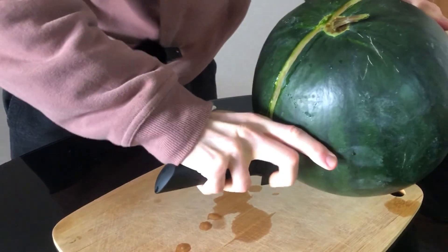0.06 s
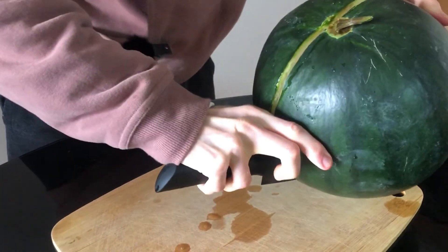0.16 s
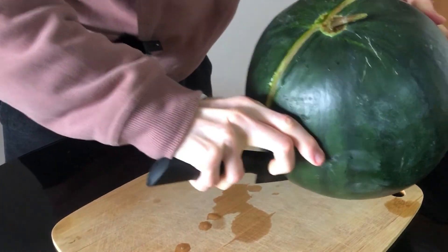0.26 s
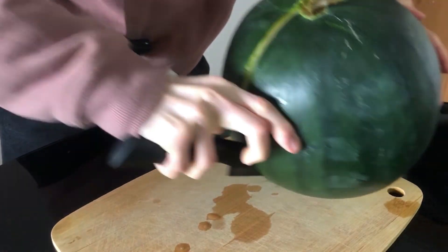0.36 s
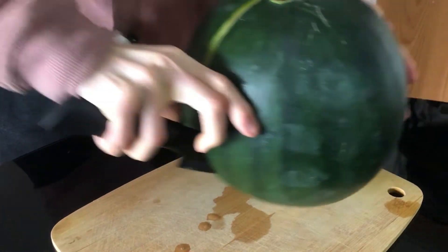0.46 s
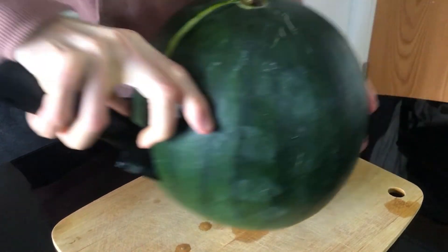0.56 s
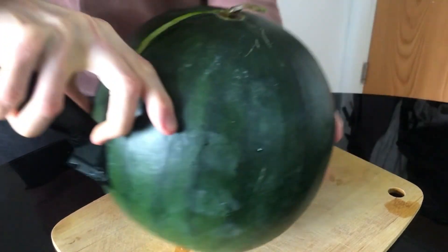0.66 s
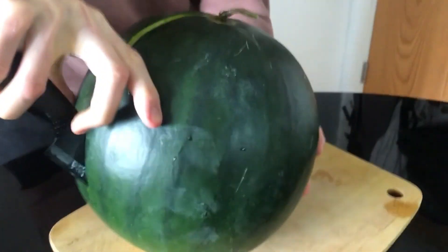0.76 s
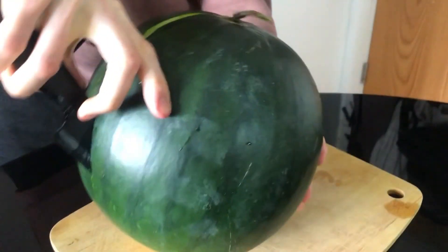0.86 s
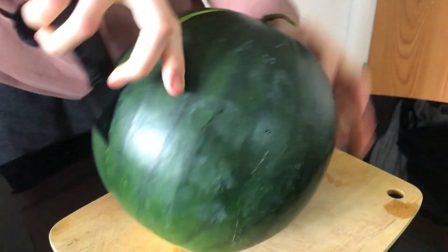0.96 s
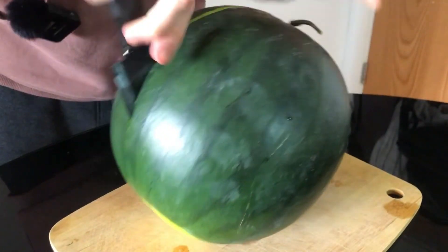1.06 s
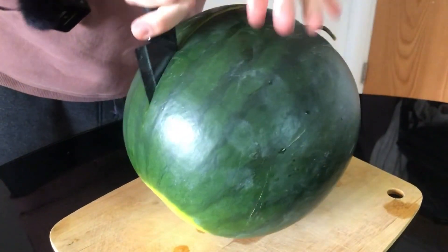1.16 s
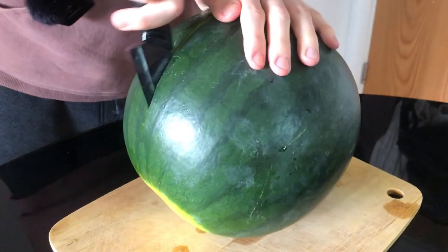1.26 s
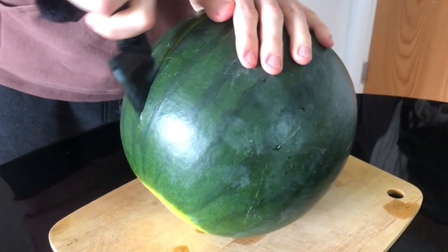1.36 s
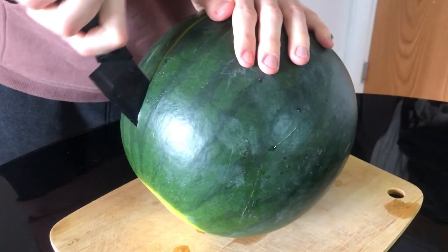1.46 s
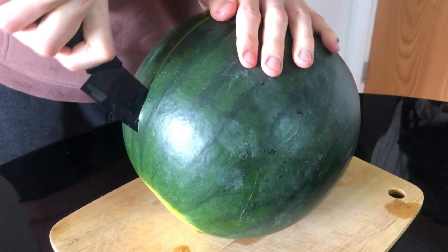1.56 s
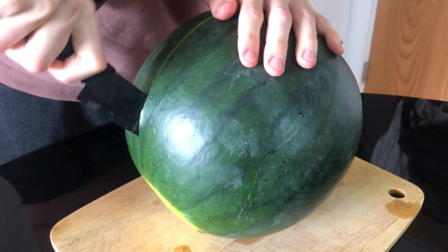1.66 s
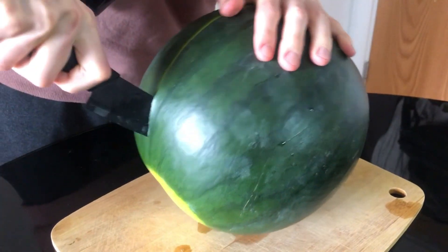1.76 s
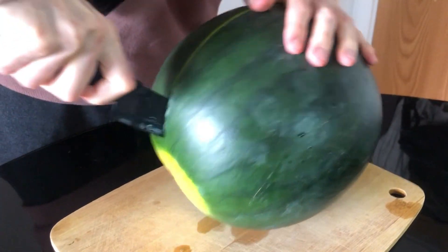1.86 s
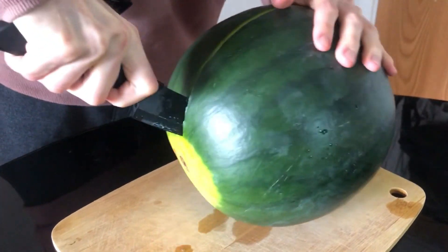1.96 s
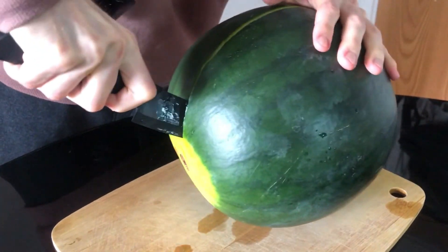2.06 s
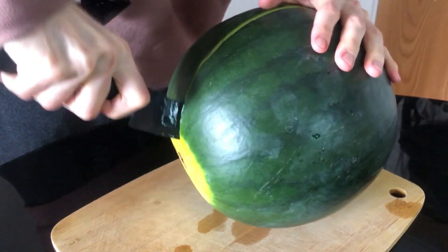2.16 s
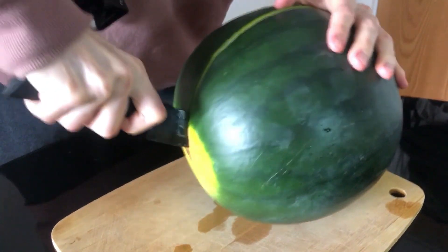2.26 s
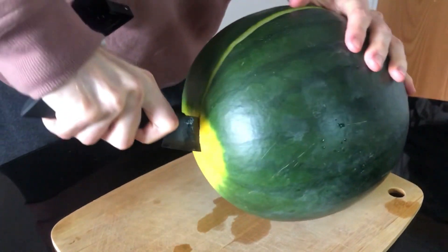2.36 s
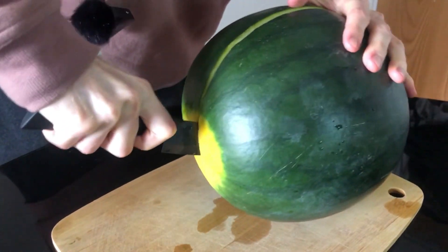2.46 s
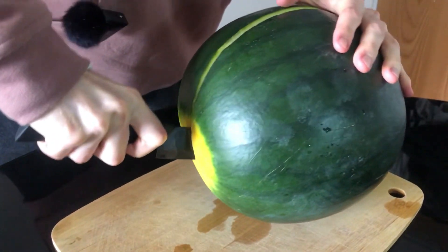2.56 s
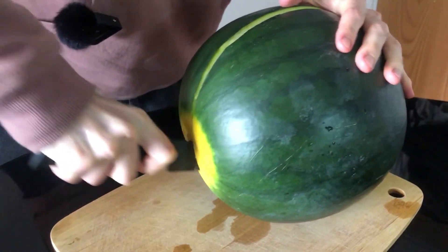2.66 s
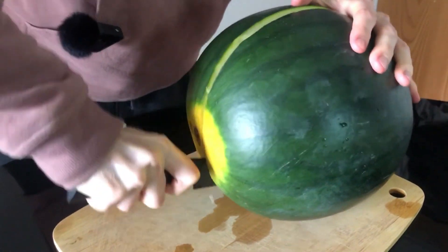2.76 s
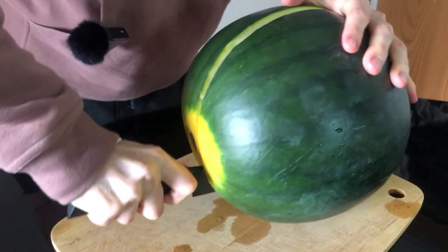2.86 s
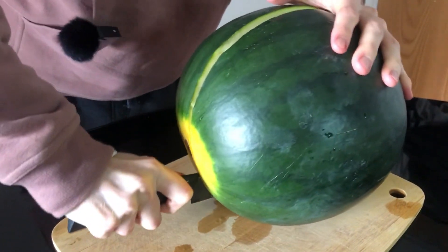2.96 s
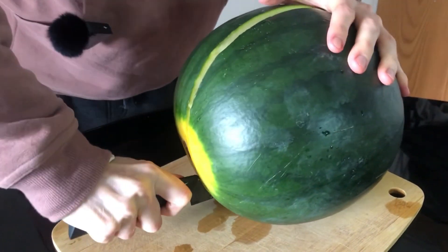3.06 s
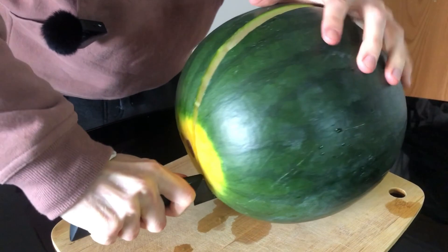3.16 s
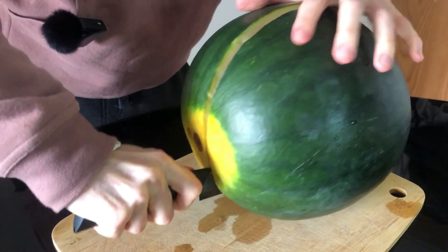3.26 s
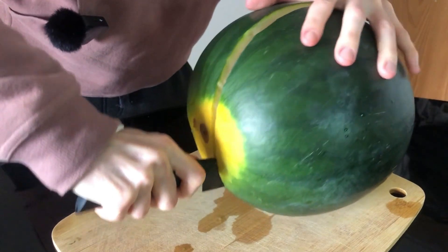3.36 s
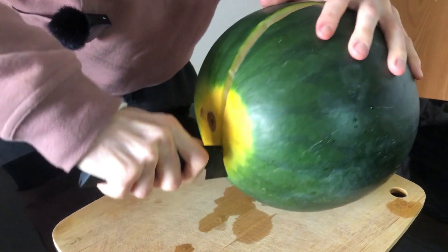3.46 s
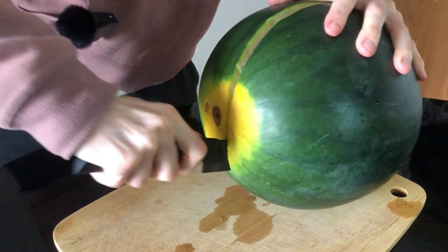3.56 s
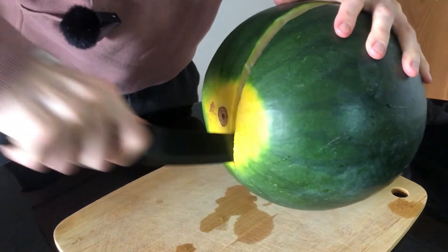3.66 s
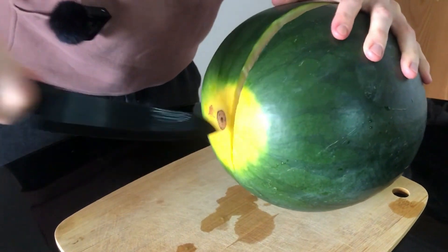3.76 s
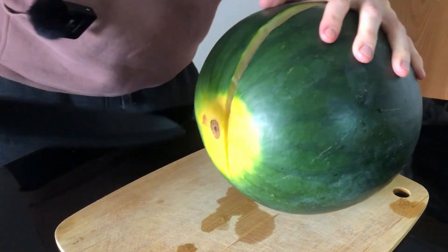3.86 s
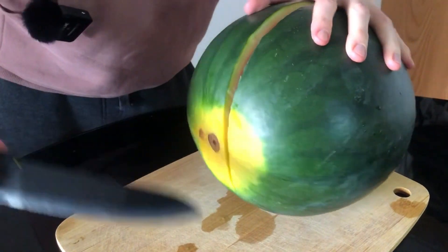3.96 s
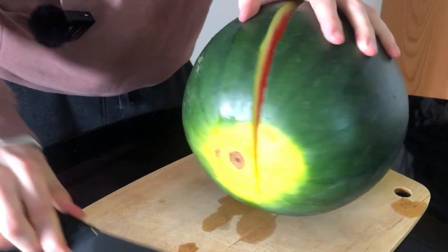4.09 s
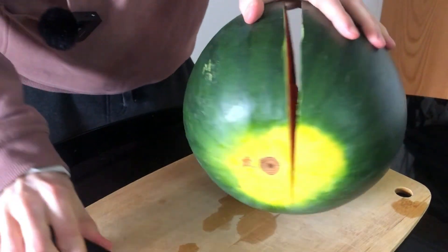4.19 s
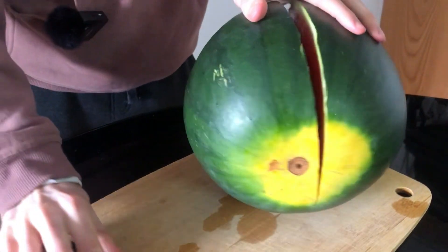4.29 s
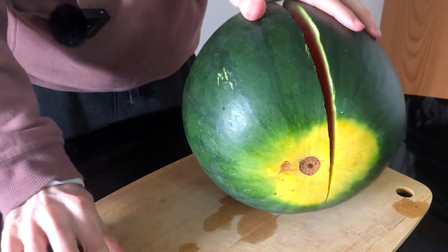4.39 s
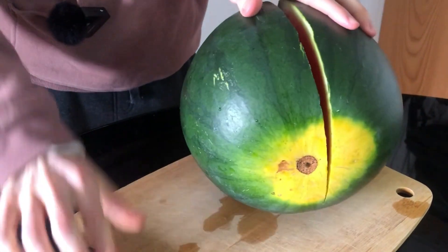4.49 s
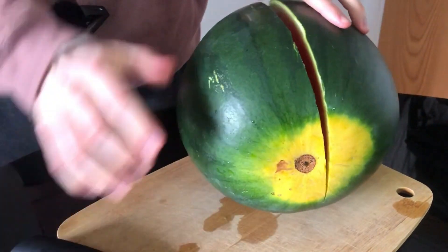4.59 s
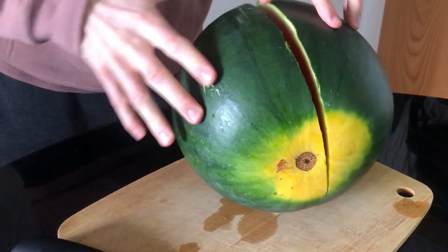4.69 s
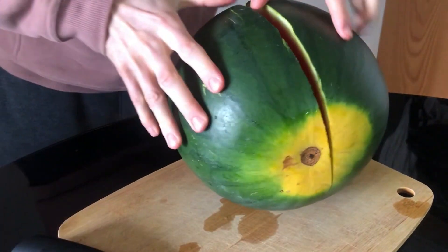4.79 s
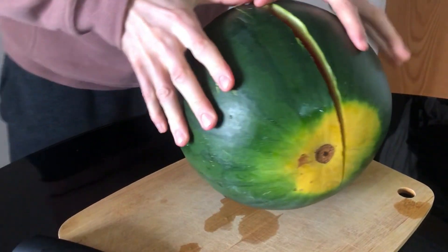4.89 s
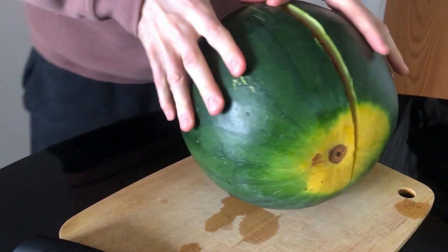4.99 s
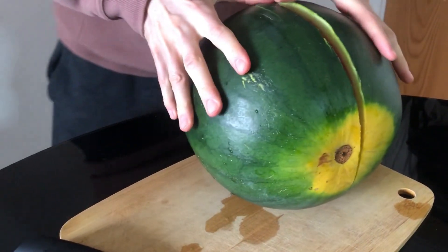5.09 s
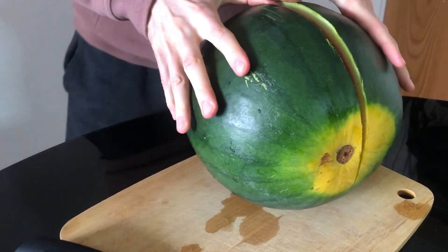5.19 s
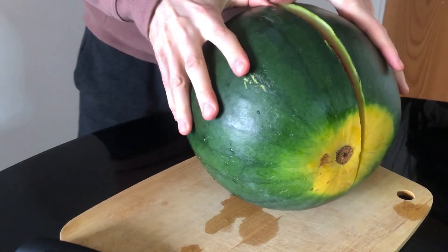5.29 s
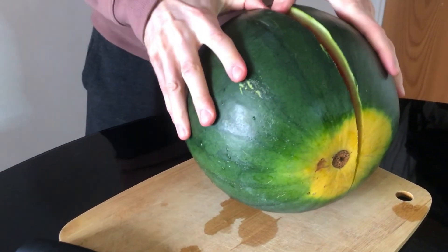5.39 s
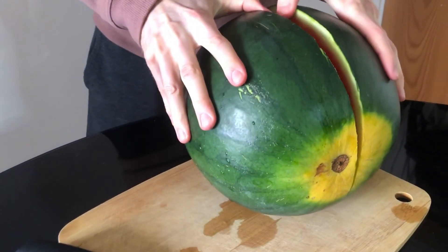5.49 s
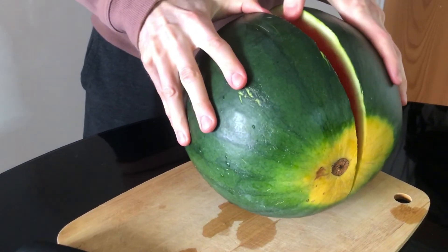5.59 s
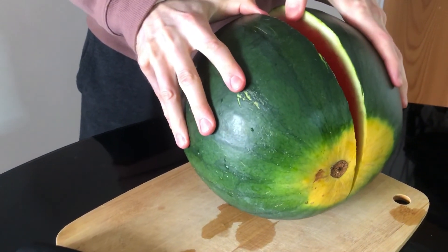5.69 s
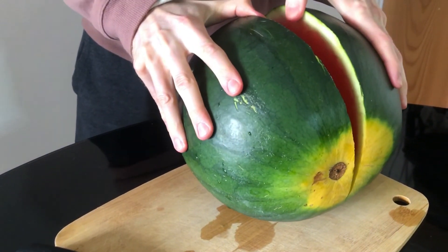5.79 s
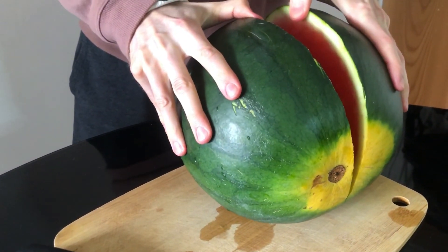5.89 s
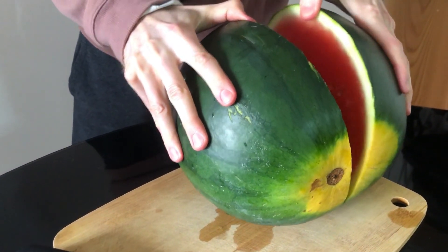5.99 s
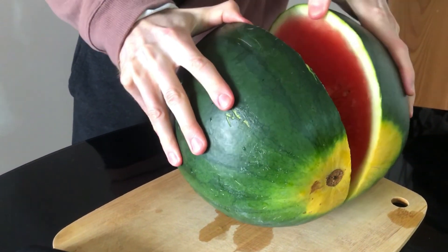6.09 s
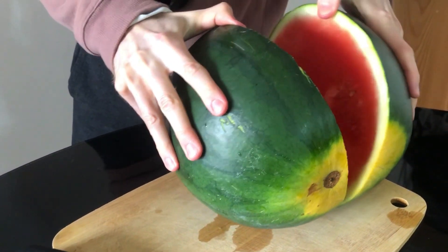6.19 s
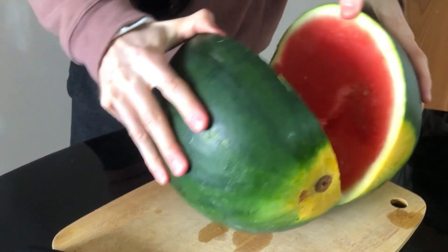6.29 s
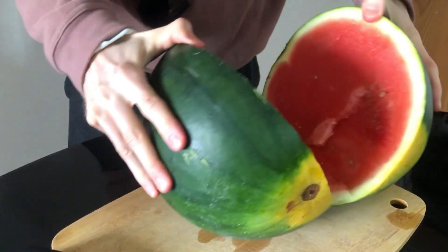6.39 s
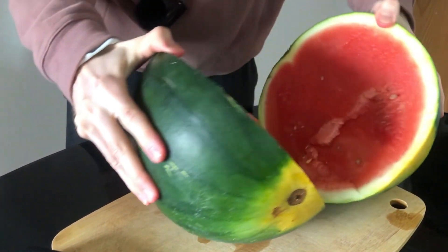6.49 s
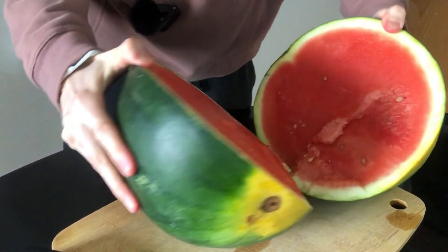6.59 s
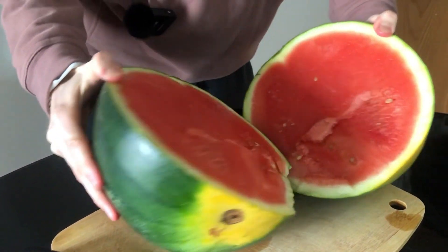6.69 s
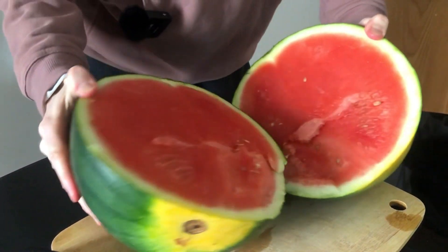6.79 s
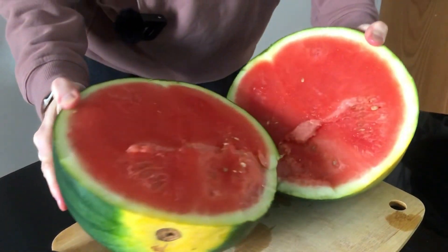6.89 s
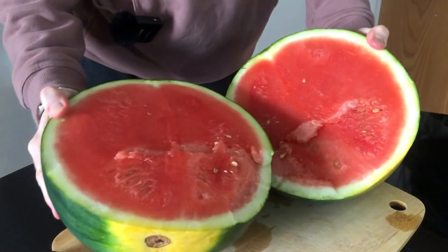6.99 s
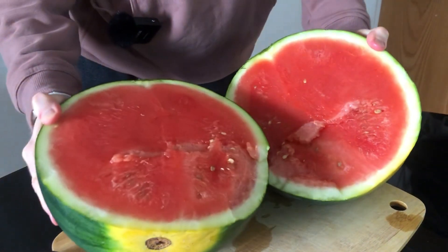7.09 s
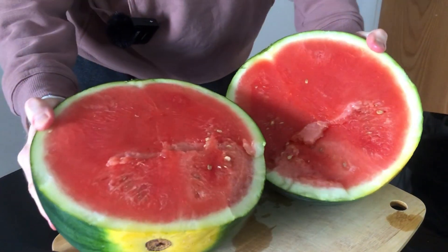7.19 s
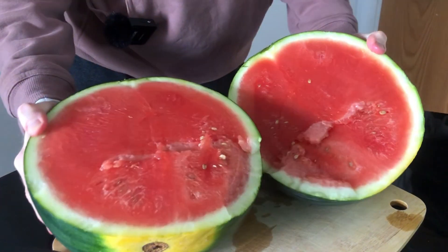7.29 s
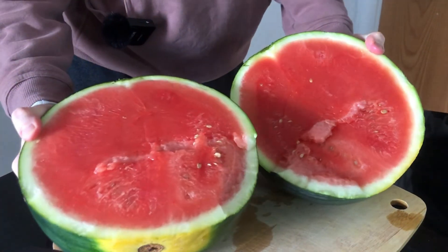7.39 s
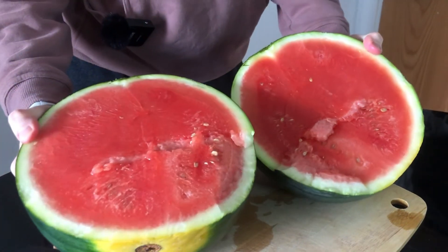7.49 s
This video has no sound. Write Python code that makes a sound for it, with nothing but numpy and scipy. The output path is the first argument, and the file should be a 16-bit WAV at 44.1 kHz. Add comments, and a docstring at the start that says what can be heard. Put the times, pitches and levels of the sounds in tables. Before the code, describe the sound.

A heavy watermelon bumps onto a wooden board, a knife saws its crackling rind, then the halves rip apart with a loud wet crunch.

```python
"""Soft knocks and a skin squeak, then a watermelon bumps on a wooden board; a knife saws its crackling rind.
The knife is laid down, sleeves rustle, and the halves are torn apart with a loud wet crunch.
Fractures and bursting cells are impulses through damped resonances; blows ring modes of board and table.
Rubbing is grainy coloured noise. A small kitchen answers; a close microphone overloads on the sharpest cracks.
"""
import sys
import numpy as np
from scipy import signal
from scipy.fft import rfft, irfft, next_fast_len
from scipy.io import wavfile
from scipy.ndimage import map_coordinates

SR = 44100
rng = np.random.default_rng(int(sys.argv[2]) if len(sys.argv) > 2 else 0)


def bounce(signal):
    """Save signal as a 16-bit WAV file at the path given by the first command-line argument."""
    frames = np.transpose(np.atleast_2d(signal))
    limited = np.clip(frames, -1, 1)
    pcm = np.round(limited * 32767).astype(np.int16)
    wavfile.write(sys.argv[1], SR, pcm)


N = 332800

# the deepening split: time_s, air_hz, air_db (relative to the pop level), whole (rind still intact, 0-1)
SPLIT = [(2.9, 420, -11, 1), (5.7, 1084, -6.5, 0.77), (5.998, 1007, -4.5, 0.71), (6.071, 749, -9.5, .25),
         (6.45, 700, -12, 0.18)]
# wet blade in the cut: full_speed_s, hold_s, hiss_db, crackle_db
STROKES = [(1.442, 0.31, -46, -66), (1.52, .13, -45, -62), (1.825, .22, -41, -44),
           (2.275, 0.24, -36.5, -39), (2.789, 0.08, -33, -27), (3.115, 0.013, -50.5, -70),
           (3.272, 0.011, -49, -48.5), (3.402, .02, -56.5, -62), (3.561, .005, -50, -58),
           (3.721, .11, -48.5, -62)]
# spectrum of dense panel modes: hz, relative_db
CLATTER = [(50, -31), (130, 0.5), (450, -2), (1200, -1), (2600, -6.5), (6500, -10), (9500, -21),
           (15000, -44)]


def amp(db):
    """Decibels to gain."""
    return 10 ** (np.asarray(db) / 20)


def unit(x):
    """Scale to rms 1."""
    return x / np.sqrt(np.mean(x ** 2) + 1e-20)


def along(points, hz):
    """Read (Hz, value) points on a log frequency axis."""
    f, v = np.transpose(points)
    return np.interp(np.log(hz + 1), np.log(f + 1), v)


def wobble(rate_hz):
    """Smooth random curve through rate_hz knots a second."""
    knots = rng.standard_normal(int(N * rate_hz / SR) + 4)
    return map_coordinates(knots, [np.arange(N) * rate_hz / SR])


def filtered(x, response):
    """Multiply the spectrum of x by a response of frequency."""
    m = next_fast_len(len(x) + SR // 2)
    return irfft(rfft(x, m) * response(np.fft.rfftfreq(m, 1 / SR)), m)[:len(x)]


def coloured(x, spectrum):
    """Shape x by (Hz, dB) points and scale to rms 1."""
    return unit(filtered(x, lambda hz: amp(along(spectrum, hz))))


def resonance(f, hz, q):
    """Causal response of one damped resonance."""
    return 1j * f * hz / q / (hz ** 2 - f ** 2 + 1j * f * hz / q)


def place(times_s, sounds):
    """Add each row of sounds to the time line at its start."""
    starts = np.round(np.asarray(times_s) * SR).astype(int)[:, None]
    at = starts + np.arange(np.shape(sounds)[1])
    return np.bincount(at.ravel(), np.ravel(sounds), N)[:N]


def ring(modes, scatter_db):
    """Damped sine modes with random strengths and signs; the rms starts near 1."""
    hz, db, t60_s = np.transpose(modes)[:, :, None]
    t = np.arange(SR // 2) / SR
    gain = amp(db + scatter_db * rng.standard_normal(hz.shape)) * rng.choice([-1, 1], hz.shape)
    decay = np.exp(-np.log(1000) * t / t60_s)
    return np.sum(gain * np.sin(2 * np.pi * hz * t) * decay, 0) / np.sqrt(np.sum(gain ** 2) / 2)


def swells(starts_s, holds_s, levels_db, rise_db_per_s, fall_db_per_s):
    """Gain of hand movements: each rises, holds and falls at steady rates in dB."""
    t = np.arange(N) / SR
    gain = np.zeros(N)
    for s, hold, db in zip(starts_s, holds_s, levels_db):
        rise = rise_db_per_s * np.maximum(s - t, 0)
        fall = fall_db_per_s * np.maximum(t - s - hold, 0)
        gain += amp(db - rise - fall)
    return gain


def bursts(hz, q, rough, life_s, top_hz, size=1024):
    """Spectra of tiny ruptures: impulse and ragged tail excite a resonance; rms 1 over a millisecond."""
    t, f = np.arange(size) / SR, np.fft.rfftfreq(size, 1 / SR)
    tail = rng.standard_normal((len(hz), size)) * np.exp(-t / life_s) * np.sqrt(2 / (life_s * SR))
    # soft, wet tissue swallows the highest treble
    wet = 1 / (1 + 1j * f / top_hz) ** 2 / np.sqrt(1 + (f / 11500) ** 6)
    z = rfft((t == 0) + rough * tail) * resonance(f, hz[:, None], q) * wet
    return z / np.sqrt(np.sum(irfft(z) ** 2, 1, keepdims=True) * 1000 / SR)


def through_rind(z, travel_s):
    """Bending waves carry treble faster than bass, so a crack chirps downward the longer it travels."""
    f = np.linspace(0, SR / 2, z.shape[1])
    phase = 2 * np.pi * travel_s[:, None] * (2 * np.sqrt(1000 * f) - f * np.sqrt(1000 / f[-1]))
    return irfft(z * np.exp(-1j * phase))


def cracks():
    """Each fracture is a bright snap and a lower pop, ringing the split's air and the still whole melon."""
    # largest fractures: time_s, snap_db, pop_db, pop_hz; levels before the offsets below
    fractures = [(1.354, -34.5, -42, 1300), (1.8104, -13, -19.5, 1350), (1.8457, -12, -26, 1800),
                 (1.8593, -19.5, -35.5, 1500), (1.9065, -1, -10, 1500), (1.9305, -8, -5, 1000),
                 (1.956, -7.5, -15, 1250), (1.978, -2.5, -8.5, 1280), (2.0063, -5, -10, 1000),
                 (2.148, -20.5, -18.5, 1550), (2.253, -13, -11.5, 730), (2.2993, -2, -11, 1080),
                 (2.3505, -1.5, -0.5, 1800), (2.38, -8.5, -21.5, 1530), (2.4158, -2.5, -12, 1350),
                 (2.4683, -2.5, -11, 1500), (2.523, -6, -13, 1140), (2.7683, -17, -20, 1200),
                 (2.787, -4, -12, 1090), (2.8042, -9, -13.5, 1000), (2.8278, -11, -15, 770),
                 (2.8376, -18.5, -21, 1050), (2.8722, -6.5, -14, 1000), (2.9027, -11.5, -18.5, 1000),
                 (2.9652, -26.5, -27.5, 1810), (3.2766, -32.5, -32, 1400), (3.3292, -28, -38.5, 2000),
                 (5.6217, -30.5, -30, 1500), (5.6632, -24, -25.5, 1720), (5.6955, -22, -34, 1700),
                 (5.742, -13.5, -19, 1320), (5.763, -18.5, -32, 1370), (5.8368, -16, -12, 1340),
                 (5.8954, -14.5, -26, 1400), (5.9423, -12, -17.5, 1670), (5.9873, -6.5, -15.5, 1100),
                 (6.0596, -3, 0, 1050), (6.0696, -5, -4, 1180), (6.1024, -4, -1, 1250),
                 (6.1118, -5.5, -12, 1340), (6.1422, 1.5, -6, 1330), (6.1535, 1.5, -5.5, 1050),
                 (6.1702, -11.5, -9, 1800), (6.1913, -5, -14.5, 2000), (6.2278, -0.5, -5, 1100),
                 (6.2393, -0.5, -5.5, 1000), (6.278, -3, -8.5, 1600), (6.3231, 1, 1, 1700),
                 (6.329, 0, -16.5, 1200), (6.3554, 2.5, -1.5, 1250), (6.3788, 3.5, -6, 1330),
                 (6.384, 3, -5.5, 1200), (6.4002, 3.5, -11.5, 1600), (6.4225, -4.5, -13.5, 1300),
                 (6.4252, 0, -18, 1230), (6.4463, -8, -12, 1200), (6.47, -6.5, -16.5, 1230),
                 (6.5334, -12, -29, 1550), (6.6127, -20, -30.5, 720)]
    # break moving from rind through flesh to last fibres: time_s, snap_hz
    snap_pitch = [(2.35, 4400), (2.8, 4700), (5.9, 4500), (6.13, 3500), (6.38, 4400), (6.6, 5900)]
    # hollow ring of the melon on its board: hz, relative_db, t60_s
    melon_modes = [(108, 2.5, 0.17), (147, 1, 0.16), (204, -3.5, .16), (286, 2, 0.14), (339.7, -3, 0.24),
                   (376, -5, .16), (519.4, -5.5, .13), (606, -0.5, 0.13)]
    s, snap_db, pop_db, pop_hz = np.transpose(fractures)
    spread = 0.097  # log pitch, snap to snap
    snap_hz = np.interp(s, *np.transpose(snap_pitch)) * np.exp(spread * rng.standard_normal(len(s)))
    when, *split = np.transpose(SPLIT)
    air_hz, air_db, whole = [np.interp(s, when, column) for column in split]

    snap = bursts(snap_hz, q=2.3, rough=0.92, life_s=0.00091, top_hz=7760)
    pop = bursts(pop_hz, q=1.1, rough=1.0, life_s=0.0026, top_hz=3000)
    push = bursts(pop_hz * 0.44, q=0.89, rough=.4, life_s=.0025, top_hz=1200)
    air = bursts(air_hz, q=2.1, rough=0.53, life_s=0.001, top_hz=2510)
    spectra = amp(snap_db)[:, None] * snap + amp(pop_db - 2)[:, None] * pop
    spectra = spectra + amp(pop_db - 9.5)[:, None] * push + amp(pop_db + air_db)[:, None] * air
    sounds = through_rind(spectra, travel_s=.0017 * np.sqrt(np.abs(whole)))

    excitation = place(s, whole[:, None] * sounds)
    body = signal.fftconvolve(excitation, ring(melon_modes, scatter_db=-0.5))[:N]
    return place(s - .0002, sounds) + amp(-44.5) * body


def crackle(gain, rate_hz, size_db, pitch_hz, spread=.35):
    """Countless juicy cells burst around the large fractures and stir the air in the split."""
    count = int(rate_hz * N / SR)
    s = rng.uniform(0, N / SR, count)
    strength = amp(size_db * np.minimum(rng.exponential(size=count), 3))
    hz = np.clip(pitch_hz * np.exp(spread * rng.standard_normal(count)), 300, 14000)
    when, air_hz, *_ = np.transpose(SPLIT)
    snap = bursts(hz, q=2.8, rough=0.83, life_s=.0005, top_hz=9100, size=384)
    pop = bursts(hz / 3.2, q=10.0, rough=0.46, life_s=.001, top_hz=3000, size=384)
    air = bursts(np.interp(s, when, air_hz), q=1.9, rough=.4, life_s=.001, top_hz=2500, size=384)
    grains = irfft(snap + amp(-6.5) * pop + amp(-11.5) * air)
    return gain * unit(place(s, strength[:, None] * grains))


def flesh_crackle():
    """Cells burst as stretches of flesh give way and the halves part."""
    # full_strain_s, hold_s, crackle_db
    tears = [(5.686, 0.091, -35), (5.918, 0.13, -36), (6.041, 0.36, -31), (6.088, 0.023, -24),
             (6.366, 0.023, -14), (6.451, 0.054, -28.5), (6.565, 0.11, -47.5)]
    tearing = swells(*np.transpose(tears), rise_db_per_s=250, fall_db_per_s=260)
    return crackle(tearing, rate_hz=420, size_db=6.0, pitch_hz=4700)


def rind_crackle():
    """Cells burst where the blade bites during each stroke."""
    start, hold, _, crackle_db = np.transpose(STROKES)
    biting = swells(start, hold, crackle_db, rise_db_per_s=510, fall_db_per_s=330)
    return crackle(biting, rate_hz=300, size_db=7.0, pitch_hz=6700)


def blows(rows, modes, contact_hz, contact_life_s, damped_db, ring_db, clatter_db, clatter_life_s):
    """Hard blows: short contact noise, dense panel clatter, and modes that drop quickly, then ring on."""
    t = np.arange(SR // 2) / SR
    sounds = []
    for s, db, contact_db in rows:
        a, b = rng.standard_normal((2, len(t)))
        contact = unit(filtered(a, lambda f: resonance(f, contact_hz, 1.6) / (1 + (f / 9000) ** 4)))
        contact = contact * np.exp(-t / contact_life_s)
        clatter = coloured(b, CLATTER) * np.exp(-t / clatter_life_s)
        swing = amp(damped_db) + (1 - amp(damped_db)) * np.exp(-t / 0.009)
        body = amp(ring_db) * swing * ring(modes, scatter_db=3.0) + amp(clatter_db) * clatter
        sounds.append(amp(db) * body + amp(contact_db) * contact)
    return place([row[0] for row in rows], sounds)


def melon_bumps():
    """The heavy melon slaps the board and excites its modes."""
    # time_s, body_db, slap_db
    bumps = [(0.8632, -7.5, -3), (0.8675, -12.5, -18), (0.8730, -14, -23)]
    # board and table: hz, relative_db, t60_s
    board_modes = [(118, -4.5, 0.16), (194, -1.5, 0.15), (290, -1, 0.19), (440, -1, .3), (556, -5.5, 0.23),
                   (930, -5, .15), (1205, -1, 0.21), (1880, -10, .1), (2420, -2.5, .14), (2640, -3, .18),
                   (2790, -7.5, 0.15)]
    return blows(bumps, board_modes, contact_hz=2840, contact_life_s=0.0029, damped_db=-15,
                 ring_db=-6.5, clatter_db=-4.5, clatter_life_s=0.0079)


def knife_laid_down():
    """The knife ticks and rocks on the table top, ringing their modes."""
    # time_s, body_db, tick_db
    contacts = [(4.4020, -14.5, -14.5), (4.4042, -10.5, -23), (4.4240, -27, -45), (4.4455, -22, -26),
                (4.4495, -15, -29), (4.4740, -37, -39)]
    # knife against table top: hz, relative_db, t60_s
    knife_modes = [(317, -10, .15), (420, -12.5, 0.13), (635, -11, .14), (813, -5.5, .1),
                   (1004, -7.5, 0.22), (1428, -2, 0.11), (1560, -2.5, 0.3), (2140, 3.5, 0.066),
                   (2856, -3, 0.058), (3620, -3, 0.024), (4640, -4, 0.041), (7100, -38, 0.22)]
    return blows(contacts, knife_modes, contact_hz=4160, contact_life_s=0.0026, damped_db=-23,
                 ring_db=-2, clatter_db=-13, clatter_life_s=0.004)


def knocks():
    """Soft contacts of hands, handle and rind: a dull pat and low table modes through a lowpass."""
    # time_s, level_db (before the lowpass), corner_hz
    contacts = [(0.182, -45, 696), (0.369, -42.5, 1000), (0.471, -46, 1090), (0.501, -43.5, 1200),
                (0.537, -44.5, 1200), (0.69, -36, 523), (0.856, -23.5, 500), (0.865, -15, 150),
                (1.02, -32.5, 300), (1.355, -37, 700), (1.378, -36.5, 200), (4.562, -23, 453),
                (4.588, -25, 910), (6.666, -29.5, 395), (6.713, -41.5, 900), (6.871, -51, 1510)]
    # low table modes: hz, relative_db, t60_s
    thud_modes = [(105, -9, 0.12), (190, -3.5, 0.1), (282, 0, 0.084), (420, -3, 0.05), (635, -7, 0.051)]
    t = np.arange(SR // 2) / SR
    sounds = []
    for s, db, corner_hz in contacts:
        pat = coloured(rng.standard_normal(len(t)), CLATTER) * np.exp(-t / .004)
        contact = amp(-2.5) * ring(thud_modes, scatter_db=2.5) + amp(3.0) * pat
        sounds.append(amp(db) * filtered(contact, lambda f: 1 / (1 + 1j * f / corner_hz)))
    return place([row[0] for row in contacts], sounds)


def friction(gain, spectrum, grain_db, grain_rate_hz):
    """A hiss of coloured noise, made grainy by fast random level changes."""
    hiss = coloured(rng.standard_normal(N), spectrum)
    return gain * hiss * unit(amp(grain_db * wobble(grain_rate_hz)))


def blade_hiss():
    """The wet blade rubs the sides of the cut on each stroke."""
    # hz, relative_db
    spectrum = [(59, -35.5), (100, -6), (174, -8.5), (328, 1), (461, -8), (608, -3), (1520, -10.5),
                (3120, -4), (5530, -6.5), (7940, -8), (16000, -29)]
    start, hold, hiss_db, _ = np.transpose(STROKES)
    sliding = swells(start, hold, hiss_db, rise_db_per_s=240, fall_db_per_s=190)
    return friction(sliding, spectrum, grain_db=2.2, grain_rate_hz=170)


def sleeves():
    """Sleeves and palms brush past, over a faint steady grainy hiss."""
    # full_speed_s, hold_s, level_db
    brushes = [(0, 0.78, -68.5), (0.314, .04, -61.5), (1.115, 0.21, -63.5), (4.061, 0.29, -67.5),
               (4.814, 0.0041, -38.5), (4.924, 0.037, -44), (5.064, 0.031, -44), (5.185, 0.069, -48.5),
               (5.387, 0.1, -45.5), (5.638, 0.056, -50.5), (6.847, 0.038, -49.5), (7.0, 0.036, -57.5)]
    # hz, relative_db
    spectrum = [(41, -39.5), (70, -16), (86, -4.5), (190, -1.5), (711, -6), (1150, -8), (2370, -11),
                (4280, -6), (8860, -15.5), (16000, -33.5)]
    steady_db = -67
    gain = amp(steady_db) + swells(*np.transpose(brushes), rise_db_per_s=270, fall_db_per_s=240)
    return friction(gain, spectrum, grain_db=1.0, grain_rate_hz=97)


def squeaks():
    """Damp skin sticks and slips on the rind at an unsteady, rising rate."""
    # start_s, length_s, start_hz, end_hz, level_db (fundamental at mid-squeak)
    slips = [(0.63, 0.19, 1500, 1630, -59), (4.765, 0.04, 1000, 1600, -44)]
    t = np.arange(N) / SR
    out = np.zeros(N)
    for s, length, start_hz, end_hz, db in slips:
        u = np.clip((t - s) / length, 0, 1)
        pitch_hz = (start_hz + (end_hz - start_hz) * u) * (1 + 0.04 * wobble(640))
        phase = 2 * np.pi * np.cumsum(pitch_hz) / SR
        tone = np.sin(phase) + .5 * np.sin(2 * phase)
        out += amp(db) * np.sqrt(2) * np.sin(np.pi * u) * tone
    return out


def kitchen(x, onset_s, early):
    """The table and nearby walls answer first, then a diffuse noise tail dies away."""
    # hz, t60_s
    room_t60 = [(100, .45), (300, 0.49), (800, .4), (2000, 0.45), (4500, 0.46), (8000, 0.32), (15000, 0.17)]
    # hz, gain_db
    room_colour = [(80, -4.5), (300, 0), (700, 0.5), (1500, -4.5), (4000, -9.5), (8000, -3.5),
                   (15000, -0.5)]
    hz, t, z = signal.stft(rng.standard_normal(SR * 3 // 4), SR, nperseg=256)
    z = z * np.exp(-np.log(1000) * t / along(room_t60, hz)[:, None])
    tail = signal.istft(z, SR, nperseg=256)[1]
    t = np.arange(len(tail)) / SR
    tail = tail * (1 - np.exp(-(t / onset_s) ** 2)) * (1 + early * np.exp(-t / 0.02))
    tail = filtered(tail / np.linalg.norm(tail), lambda f: amp(along(room_colour, f)))
    return signal.fftconvolve(x, tail)[:N]


def background():
    """Quiet room air as coloured noise, and faint appliance hum as sines of wandering phase."""
    # air: hz, relative_db
    air = [(12, -46), (20, -15.5), (81, -3.5), (234, -7.5), (319, -3), (642, -24.5), (923, -7), (1090, -15),
           (1440, -16.5), (1660, -28), (2600, -28), (8650, -25.5), (16000, -28.5)]
    # appliance: hz, level_db (rms)
    hum_tones = [(98, -66.5), (148, -70), (345, -70), (393, -70.5)]
    t = np.arange(N) / SR
    hum = np.zeros(N)
    for hz, db in hum_tones:
        hum += amp(db) * np.sqrt(2) * np.sin(2 * np.pi * hz * t + 0.5 * wobble(2.7))
    return amp(-62.0) * coloured(rng.standard_normal(N), air) + hum


def scene():
    """Cutting, table blows, rubbing and background; the kitchen answers the cutting and the blows."""
    cut = cracks() + rind_crackle() + flesh_crackle()
    # the table blows carry almost no deep bass
    highpass = signal.butter(3, 85, "highpass", fs=SR, output="sos")
    table = signal.sosfilt(highpass, melon_bumps() + knife_laid_down() + knocks())
    rubbing = blade_hiss() + sleeves() + squeaks()
    room = kitchen(amp(-7.5) * cut + amp(-1.5) * table, onset_s=0.001, early=.6)
    return (cut + table + room + rubbing + background())[None]


def record(dry):
    """Overload rounds off the highest peaks; a steep lowpass then sets the band limit."""
    hardness, top_hz = 4, 16000
    clipped = dry[0] / (1 + np.abs(dry[0]) ** hardness) ** (1 / hardness)
    return filtered(clipped, lambda hz: 1 / (1 + (hz / top_hz) ** 120))[None]


dry = scene()
out = record(dry)
bounce(out)
```